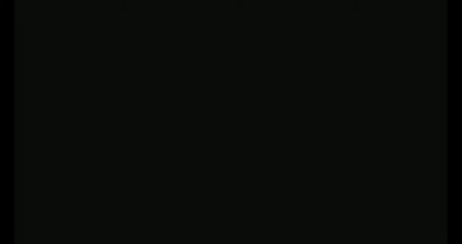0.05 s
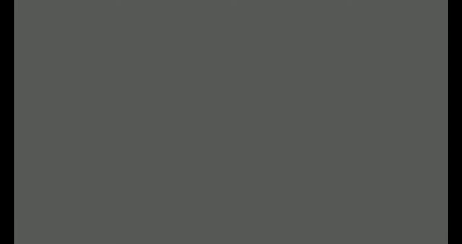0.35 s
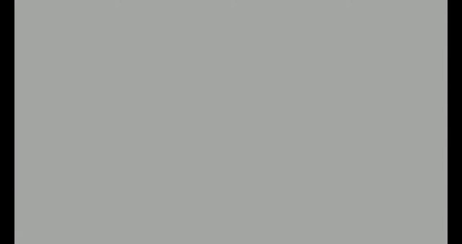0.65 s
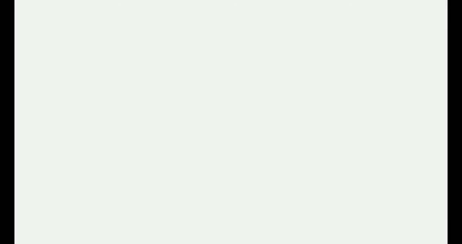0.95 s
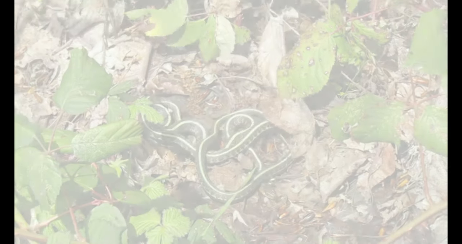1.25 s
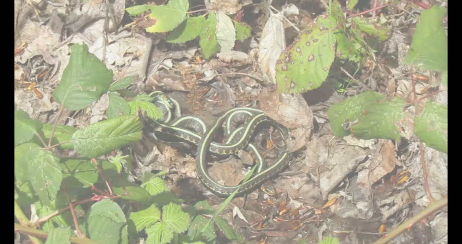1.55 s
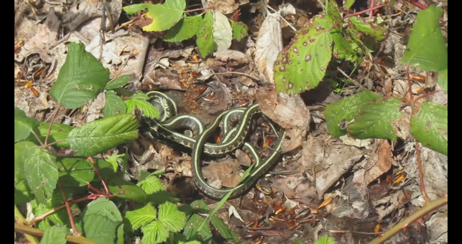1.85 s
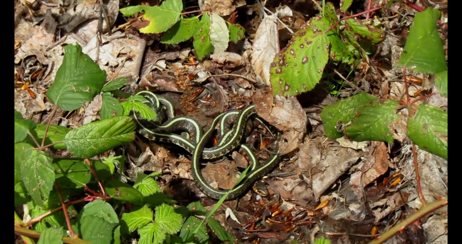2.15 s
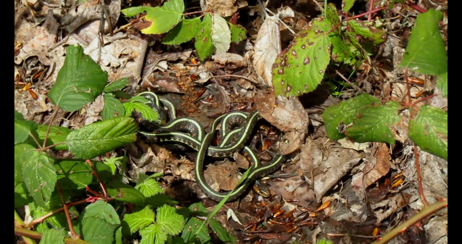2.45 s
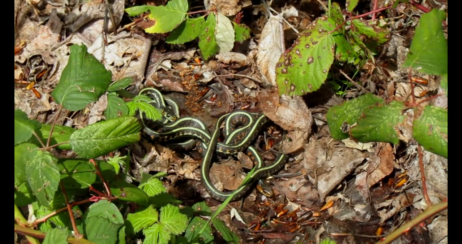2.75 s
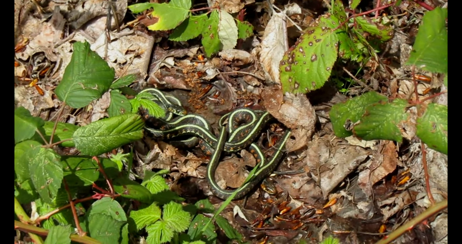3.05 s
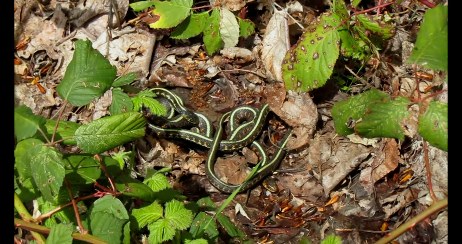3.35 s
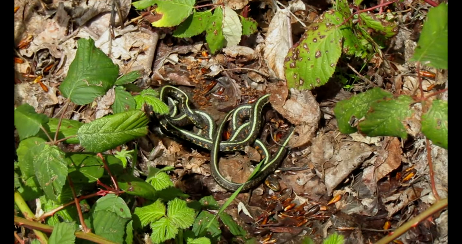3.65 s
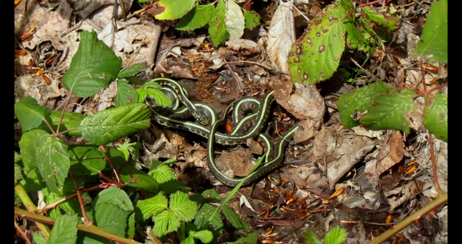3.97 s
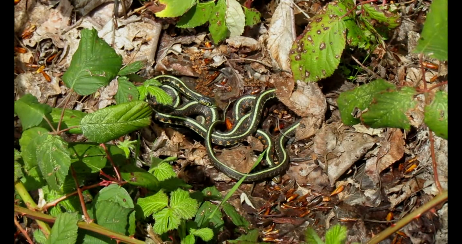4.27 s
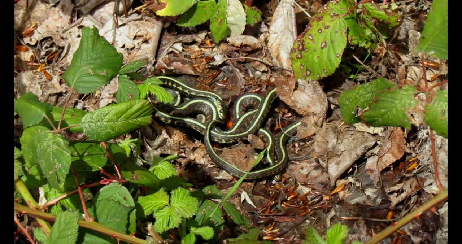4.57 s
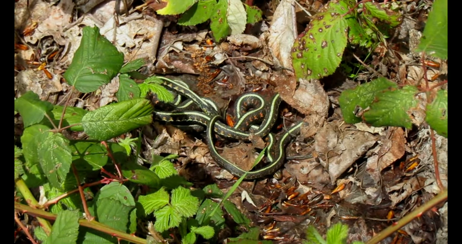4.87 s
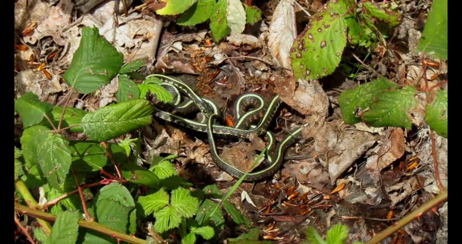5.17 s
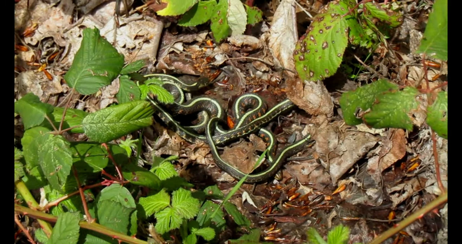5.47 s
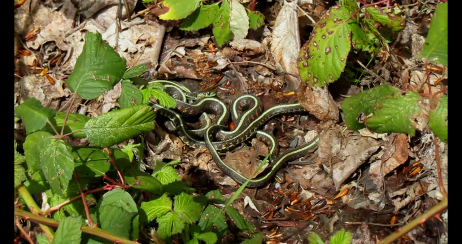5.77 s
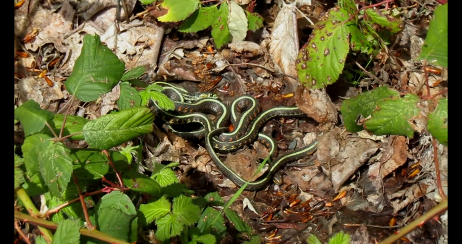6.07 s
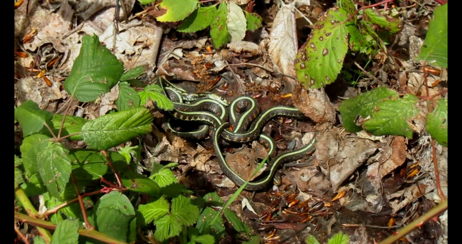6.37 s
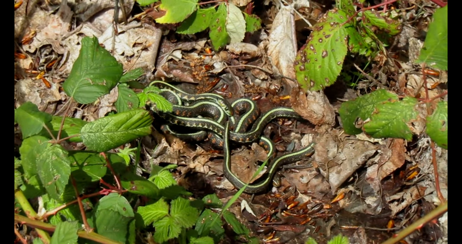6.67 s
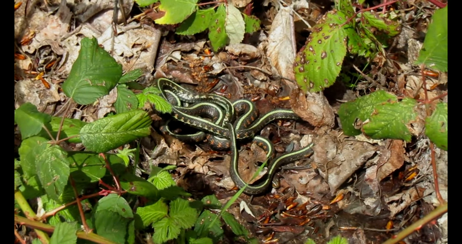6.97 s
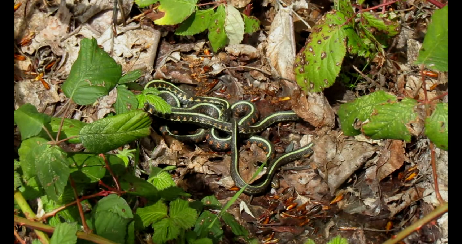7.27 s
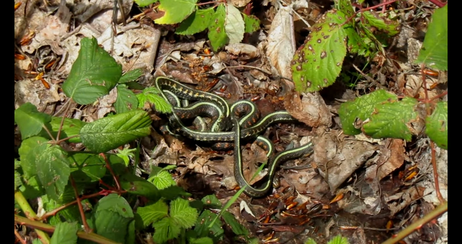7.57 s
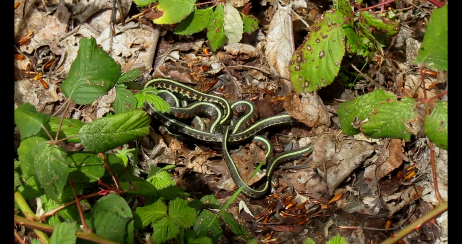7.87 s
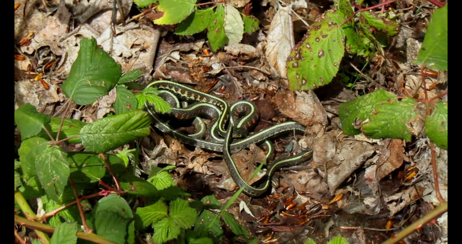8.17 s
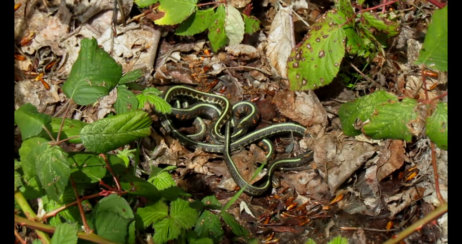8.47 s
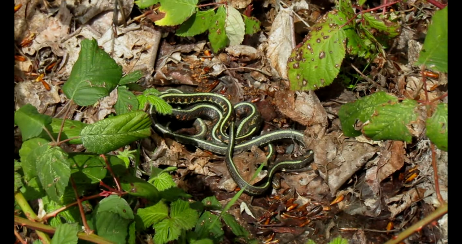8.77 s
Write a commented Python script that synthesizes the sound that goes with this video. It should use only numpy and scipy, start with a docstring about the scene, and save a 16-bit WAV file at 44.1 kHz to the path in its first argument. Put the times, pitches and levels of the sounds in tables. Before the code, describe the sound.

Faint woodland air with a few bird chirps, tiny dry leaf snaps and a distant engine drone, then low wind buffeting the microphone.

```python
"""A spring woodland floor in a light breeze, fading in. Air murmurs in the trees, an engine drones
far off on the harmonics of its firing rate, and the microphone's electronics hiss and whine faintly.
Birds whistle and trill, and a small one gives two sharp chips with both sides of its syrinx;
trunks scatter whistles and chips into echoes. Dry leaves snap now and then.
Later, eddies of wind buffet the microphone with low swings of pressure."""
import sys
import numpy as np
from scipy import signal
from scipy.io import wavfile

SR = 44100
rng = np.random.default_rng(int(sys.argv[2]) if len(sys.argv) > 2 else 0)


def to_wav(s):
    """Save 16-bit WAV."""
    ch = np.atleast_2d(s).T  # columns
    pcm = np.round(np.clip(ch, -1, 1) * 32767)  # PCM
    wavfile.write(sys.argv[1], SR, pcm.astype(np.int16))


N = 397782
TIME = np.arange(N) / SR


def from_db(db):
    """Amplitude grows tenfold with every 20 dB."""
    return 10 ** (np.asarray(db) / 20)

def rms_one(x):
    """Dividing by the rms gives unit power."""
    return x / np.sqrt(np.mean(x ** 2) + 1e-20)

def gain_curve(rows):
    """Amplitude whose level runs linearly between rows of t/s, level/dB."""
    return from_db(np.interp(TIME, *np.transpose(rows)))

def drift(rate_hz):
    """Low-passed noise: a random fluctuation of unit rms."""
    step = 40   # samples between values
    pole = np.exp(-2 * np.pi * rate_hz * step / SR)
    white = rng.standard_normal(N // step + 2002)
    slow = signal.lfilter([1], [1, -2 * pole, pole * pole], white)[2000:]
    return np.interp(np.arange(N) / step, np.arange(len(slow)), rms_one(slow))

def band(x, low_hz, high_hz, order=2):
    """Butterworth band-pass filtering."""
    sos = signal.butter(order, [low_hz, min(high_hz, .45 * SR)], "band", fs=SR, output="sos")
    return signal.sosfilt(sos, x)

def shaped_noise(spectrum, patchy_db, patch_hz):
    """Third-octave noise bands, independently modulated and summed to unit rms."""
    hz, level_db = np.transpose(spectrum)
    edges = 18 * 2 ** (np.arange(31) / 3)
    white, out = rng.standard_normal((2, N)), 0
    for k, (low, high) in enumerate(zip(edges, edges[1:])):
        db = np.interp(np.log(low * high) / 2, np.log(hz), level_db)
        if low < 2 * hz[-1]:
            out = out + from_db(db + patchy_db * drift(patch_hz)) * band(white[k % 2], low, high)
    return rms_one(out)

def swell(u):
    """Half-sine envelope over u from 0 to 1."""
    return np.sin(np.pi * np.clip(u, 0, 1))

def held(start_s, length_s, edge_s):
    """Trapezoidal envelope: attack, hold and release."""
    return np.clip(np.minimum(TIME - start_s, start_s + length_s - TIME) / edge_s, 0, 1)

def at_random(per_s, db, hz, scatter_db, octaves):
    """Independent chance events, as rows of t/s, level/dB, f/Hz."""
    draws = rng.random((400, 4))
    kept = draws[draws[:, 0] < per_s * TIME[-1] / len(draws), 1:]
    return [(when * TIME[-1], db + scatter_db * (2 * size - 1), hz * 2 ** (octaves * (2 * pitch - 1)))
            for when, size, pitch in kept]

def air():
    """Broadband noise: moving air in the trees, together with the microphone's hiss."""
    # spectral density: f/Hz, relative level/dB
    spectrum = [(20, -11), (65, -2), (190, -4), (350, -6), (780, -7.5), (1150, -11.5), (1600, -16.5),
                (2200, -19.5), (3000, -20.5), (3900, -23.5), (5200, -24), (8500, -26), (11000, -29),
                (14500, -37)]
    return from_db(-52.5) * shaped_noise(spectrum, patchy_db=.5, patch_hz=6.9)

def engine(firing_hz=75.64, wobble=0.01115, waver_db=2.0):
    """A harmonic series on the firing rate; each partial fades in and out on its long path through air."""
    # course of the drone: t/s, level/dB
    levels = [(0, -59), (1.0, -68.5), (1.7, -60), (2.4, -58.5), (3.1, -62), (4.3, -61.5), (9.02, -66)]
    # harmonics: order, relative level/dB
    harmonics = [(1, -7.5), (2, 1), (3, -4), (4, -6), (5, -14), (6, -12.5), (7, -14)]
    phase = 2 * np.pi * np.cumsum(firing_hz * (1 + wobble * drift(3.27))) / SR
    tones = sum(from_db(db + waver_db * drift(6.1)) * np.sin(k * phase + rng.uniform(0, 2 * np.pi))
                for k, db in harmonics)
    return gain_curve(levels) * tones

def whine(waver_db=.4):
    """The electronics add a superposition of thin, nearly steady pure tones."""
    # tones: f/Hz, rms level/dB
    tones = [(3911, -87), (5581, -97), (11703, -98), (11763, -87), (11794, -89), (11823, -81), (12797, -96)]
    return sum(np.sqrt(2) * from_db(db + waver_db * drift(3.7)) * np.sin(2 * np.pi * hz * TIME)
               for hz, db in tones)

def whistles(waver=0.0076, sag_db=11, flutter_db=4.0):
    """Far birds' pure notes weaken as they go; passage through the trees modulates and blurs them."""
    # notes: onset t/s, duration/s, start f/Hz, end f/Hz, initial level/dB
    notes = [(0.255, 0.028, 3070, 3060, -45), (0.281, 0.32, 3050, 2980, -49), (.65, .05, 2980, 3020, -52.5),
             (3.002, 0.17, 2990, 2930, -66), (3.13, 0.52, 3140, 3110, -66), (3.62, .4, 3144, 3165, -66)]
    out, unsteady = np.zeros(N), 1 + waver * drift(33)
    for s, length, start_hz, end_hz, db in notes:
        u = np.clip((TIME - s) / length, 0, 1)
        hz = (start_hz + (end_hz - start_hz) * u) * unsteady
        envelope = from_db(db - sag_db * u) * held(s, length, edge_s=0.012)
        out += envelope * np.sin(2 * np.pi * np.cumsum(hz) / SR)
    return woods(out * from_db(flutter_db * drift(40)), wet_db=-7, t60=0.36)

def woods(x, wet_db, t60):
    """Reverberation: trunks scatter sound into many echoes that decay by 60 dB in t60 seconds."""
    t = TIME[:SR]
    echoes = rng.standard_normal(SR) * (rng.random(SR) < 2500 / SR)
    tail = echoes * from_db(-60 * t / t60) * (t > .004)
    return x + from_db(wet_db) * signal.fftconvolve(x, tail / np.linalg.norm(tail))[:N]

def trill(start_s=.272, step_s=.0397, width_s=0.006, count=7):
    """A bird's quick, raspy notes: narrow-band noise, amplitude-modulated by an even pulse train."""
    pulses = sum(np.exp(-((TIME - start_s - k * step_s) / width_s) ** 2) for k in range(count))
    rasp = rms_one(band(rng.standard_normal(N), 1970, 2400, order=3))
    return from_db(-54.5) * pulses * rasp

def leaves(decay_s=0.0013, band_ratio=1.2, crackle_db=-12, crackle_s=0.03):
    """Brittle fracture: a dry leaf gives way with a tiny snap, and a few fibres crackle after it."""
    # clearest snaps: t/s, level/dB, centre f/Hz
    ticks = [(0.323, -44, 10000), (0.38, -53, 11000), (2.053, -50, 12000), (2.164, -49, 6000),
             (4.868, -48, 10000), (5.367, -47, 9500), (7.159, -46.5, 1990), (7.220, -50, 11000)]
    faint = at_random(per_s=1.2, db=-54, hz=10500, scatter_db=0, octaves=.3)
    out, t = np.zeros(N), TIME[:SR // 10]
    for s, db, hz in list(ticks) + faint:
        noise = rms_one(band(rng.standard_normal(len(t)), hz / band_ratio, hz * band_ratio, order=1))
        breaks = 1.0 * (rng.random(len(t)) < 250 / SR)
        fibres = signal.lfilter([1], [1, -np.exp(-1 / (decay_s * SR))], breaks)
        envelope = np.exp(-t / decay_s) + from_db(crackle_db) * fibres * np.exp(-t / crackle_s)
        at = round(s * SR)
        out[at:at + len(t)] += (from_db(db) * noise * envelope)[:N - at]
    return band(out, 500, 12000)

def chips(low_hz=3390, high_hz=5930, upper_ratio=1.4, upper_db=-3, rough=0.0177):
    """Biphonation: both sides of the syrinx sweep upward at once; the higher voice ends sooner."""
    # upward flicks: onset t/s, lower voice's peak level/dB, duration/s
    flicks = [(0.563, -50.5, 0.037), (3.237, -46.5, .031)]
    out = np.zeros(N)
    for s, db, length in flicks:
        u = np.clip((TIME - s) / length, 0, 1)
        sweep_hz = low_hz + (high_hz - low_hz) * swell(u / 2) ** 2
        phase = 2 * np.pi * np.cumsum(sweep_hz * (1 + rough * drift(294))) / SR
        lower = swell(u) ** 3 * np.sin(phase)
        upper = from_db(upper_db) * swell(u / 0.68) ** 2 * np.sin(upper_ratio * phase)
        out += from_db(db) * (lower + upper)
    # near trunks answer first, then the wood beyond
    return woods(woods(out, wet_db=-8.5, t60=0.078), wet_db=-0.5, t60=0.41)

def breeze():
    """Envelope of the airflow at the microphone: gusts superposed on a gentler background."""
    # air between gusts, nearly still at first: t/s, level/dB
    lull = [(3.55, -80), (4.2, -62), (8.3, -54.5), (9.02, -57.5)]
    # gusts: onset t/s, duration/s, level/dB
    gusts = [(3.726, 0.44, -54), (4.874, 1.1, -53.5), (6.343, 0.38, -51.5), (6.783, 0.17, -44.5),
             (7.0, .25, -56.5), (7.386, 0.22, -43), (7.723, 0.39, -43.5)]
    return gain_curve(lull) + sum(from_db(db) * held(s, length, edge_s=.04) for s, length, db in gusts)

def wind(width_cycles=0.3, lump_db=1.5, steepening=4.8):
    """Turbulence at the microphone port: each eddy is one brief pressure swing, quicker if it is small."""
    # spectral density of the rumble: f/Hz, relative level/dB
    spectrum = [(20, 1), (40, 2), (65, 3), (110, -14), (170, -11), (260, -26), (500, -46), (1000, -60)]
    # hardest eddies: t/s, peak level/dB, centre f/Hz
    hard = [(4.006, -28.5, 135), (5.057, -28.5, 73), (5.577, -29, 160), (6.662, -33, 99),
            (6.812, -31.5, 63), (6.882, -33, 99), (7.418, -27.5, 69), (7.435, -21, 77), (7.642, -25.5, 73),
            (7.787, -27, 93.5), (7.831, -27.5, 101), (7.878, -27.5, 89.5), (7.908, -21.5, 130),
            (8.008, -21, 119), (8.024, -21, 154), (8.057, -30, 108), (8.152, -29, 79)]
    strength = breeze()
    lumps = from_db(-0.5 + lump_db * drift(8.9))
    pressure = strength * lumps * shaped_noise(spectrum, patchy_db=3.5, patch_hz=5.5)
    # small eddies take their level relative to the flow that carries them
    chance = at_random(per_s=18, db=5.5, hz=108.3, scatter_db=7, octaves=0.42)
    small = [(s, db + 20 * np.log10(strength[int(s * SR)]), hz) for s, db, hz in chance]
    for (s, db, hz), turn in zip(list(hard) + small, rng.random(N)):
        near = np.abs(TIME - s) < .08
        cycles = (TIME[near] - s) * hz
        swing = np.cos(2 * np.pi * (cycles + turn)) / np.cosh(cycles / width_cycles)
        pressure[near] += from_db(db) * swing
    # pressure goes with the square of air speed, so strong swings get sharp crests
    return pressure + steepening * band(pressure ** 2, 60, 900)

def far_calls(width_s=0.017, spread=0.079):
    """Scattering over distance smears short, high bird notes into soft puffs of narrow-band noise."""
    # clearest calls: t/s, level/dB, centre f/Hz
    calls = [(4.31, -70, 4230), (5.335, -66, 5500), (5.83, -67.5, 5500)]
    out, white = np.zeros(N), rng.standard_normal(N)
    faint = at_random(per_s=.6, db=-72, hz=5200, scatter_db=2, octaves=.2)
    for s, db, hz in list(calls) + faint:
        envelope = from_db(db) * np.exp(-((TIME - s) / width_s) ** 2)
        out += envelope * rms_one(band(white, hz * (1 - spread), hz * (1 + spread)))
    return woods(out, wet_db=1, t60=0.28)

def scene():
    """Superposition: all sources add at one microphone."""
    murmur = air()
    birds = chips() + far_calls() + whistles() + trill()
    return (murmur + birds + engine() + wind() + whine() + leaves())[None]

def record(dry):
    """Filtering and gain: a narrow treble notch, brief silence into a linear fade-in, a steep low-pass."""
    start_s, fade_s = .25, 2.03
    notch_hz, cutoff_hz = 7900, 15000
    notched = signal.lfilter(*signal.iirnotch(notch_hz, Q=22, fs=SR), dry)
    fade = np.minimum(TIME / fade_s, 1) * np.clip((TIME - start_s) / 0.0035, 0, 1)
    return signal.sosfilt(signal.ellip(12, .1, 80, cutoff_hz, fs=SR, output="sos"), notched * fade)


dry = scene()
out = record(dry)
to_wav(out)
```